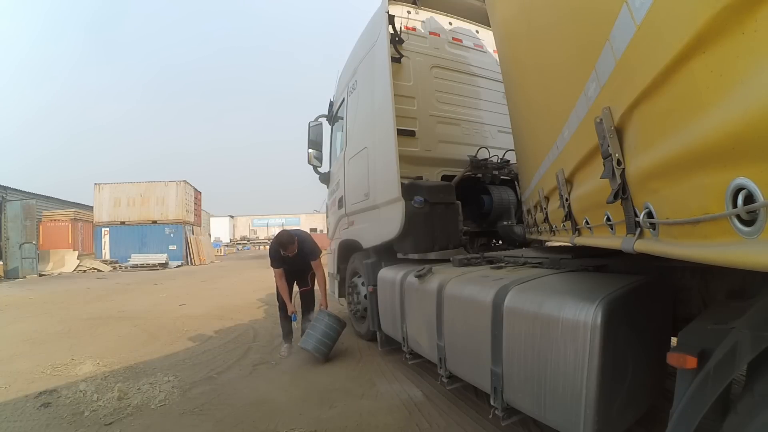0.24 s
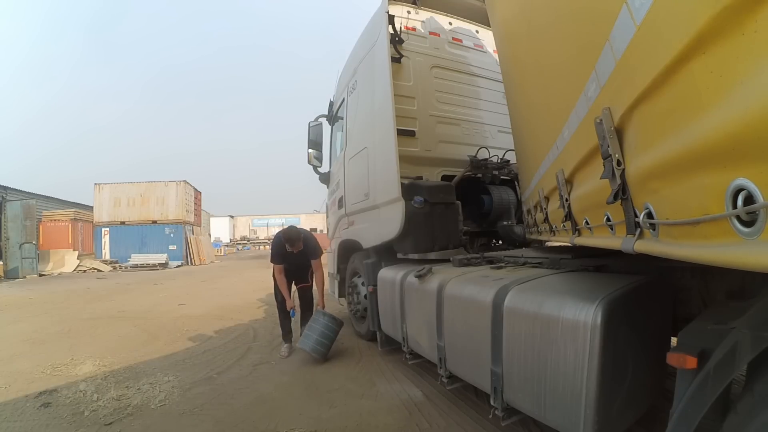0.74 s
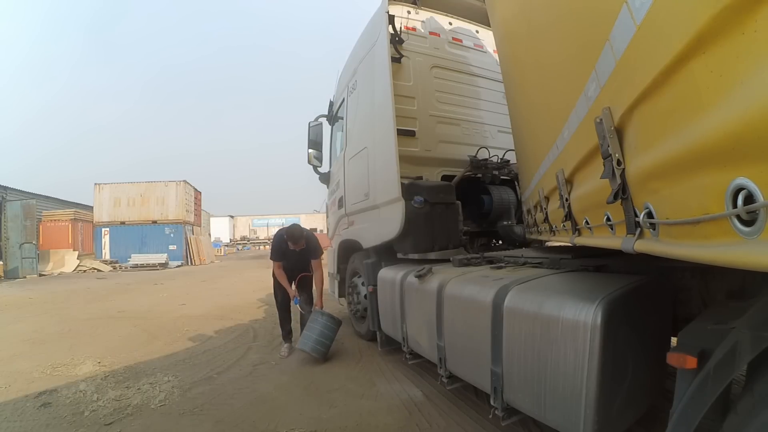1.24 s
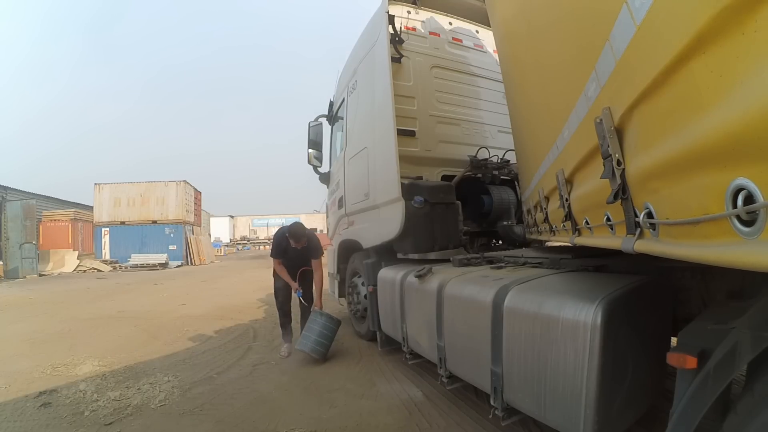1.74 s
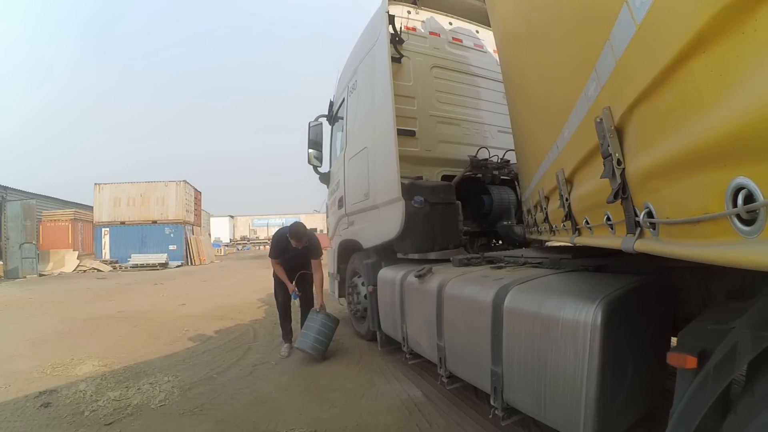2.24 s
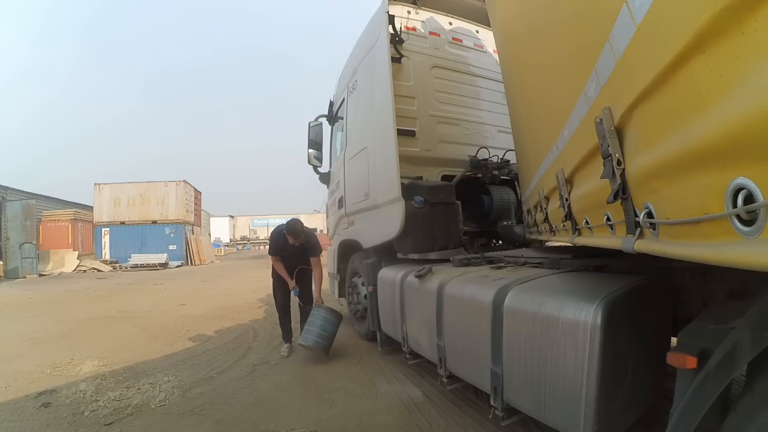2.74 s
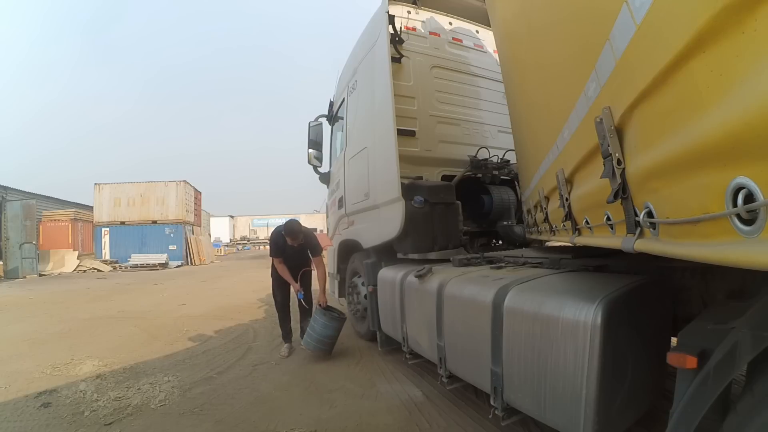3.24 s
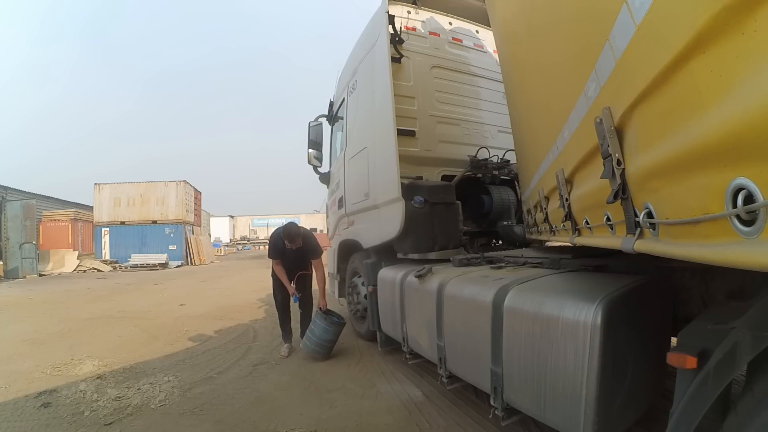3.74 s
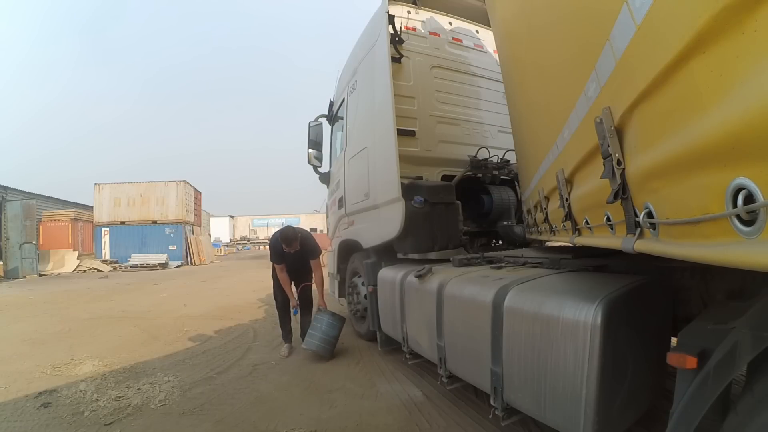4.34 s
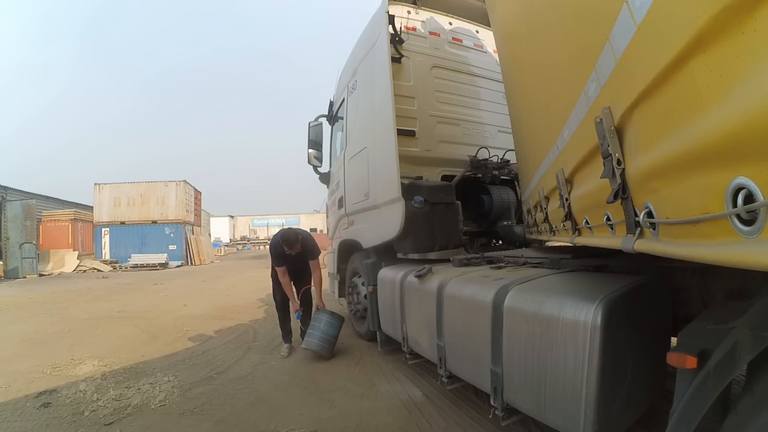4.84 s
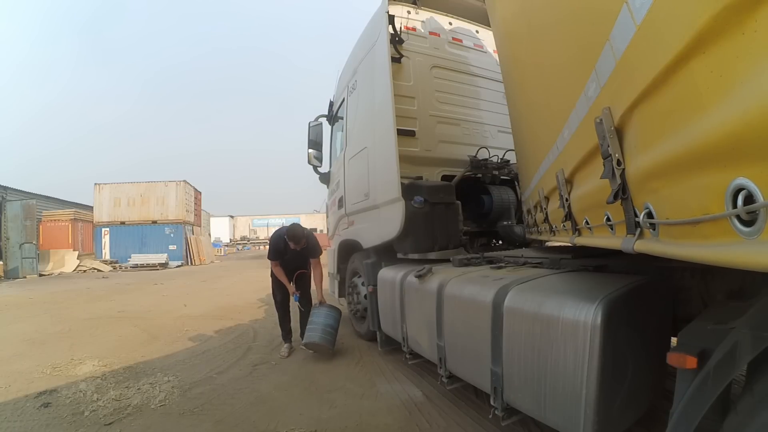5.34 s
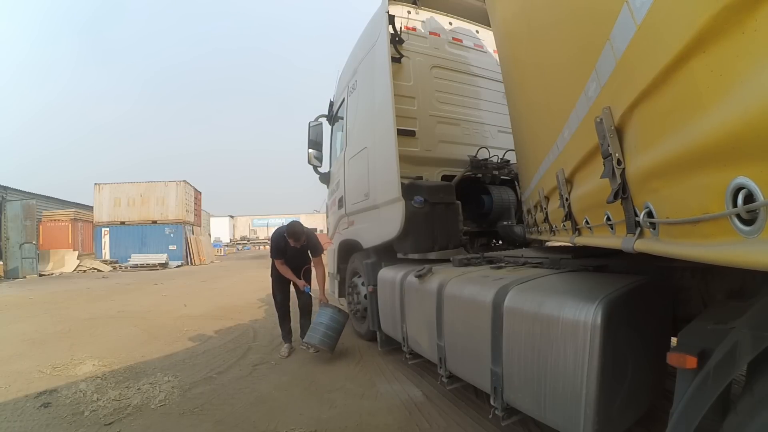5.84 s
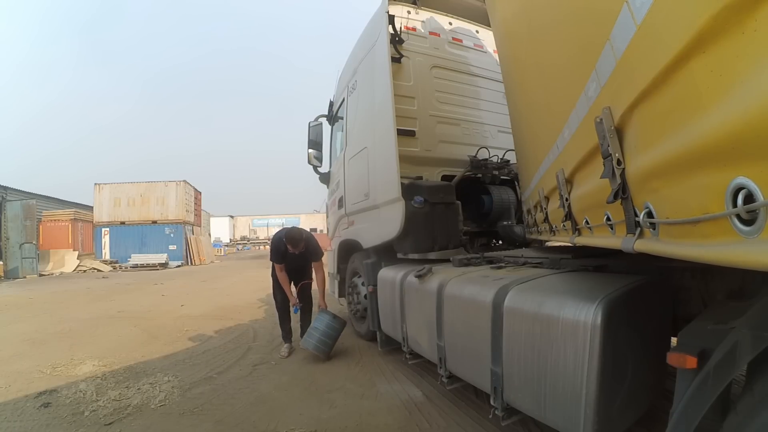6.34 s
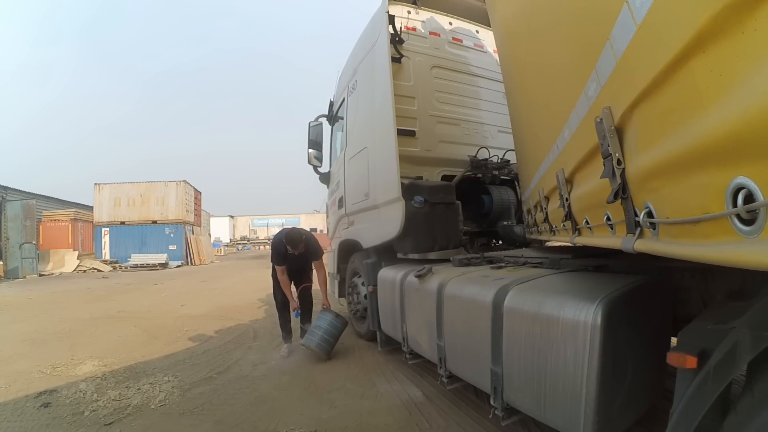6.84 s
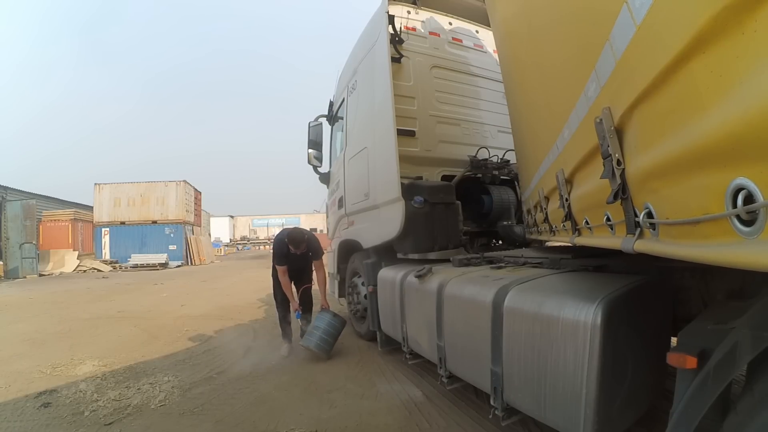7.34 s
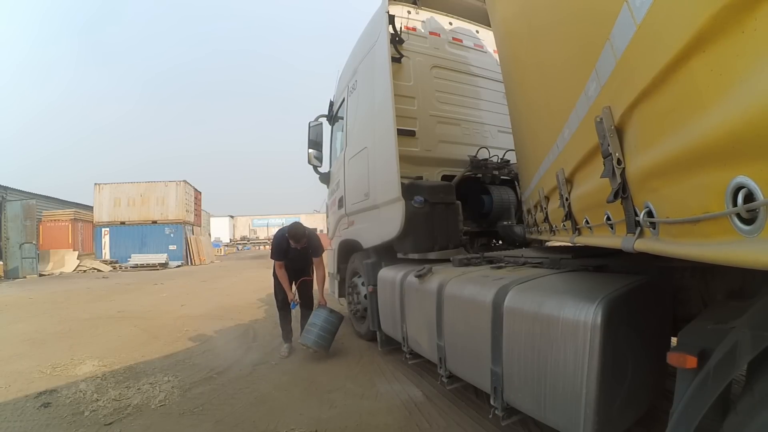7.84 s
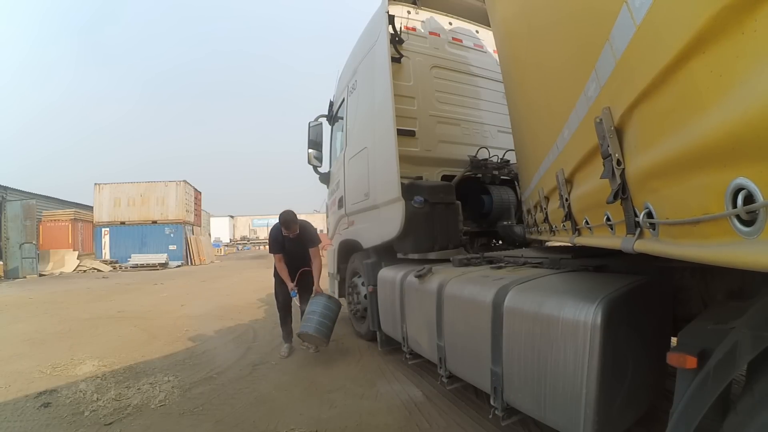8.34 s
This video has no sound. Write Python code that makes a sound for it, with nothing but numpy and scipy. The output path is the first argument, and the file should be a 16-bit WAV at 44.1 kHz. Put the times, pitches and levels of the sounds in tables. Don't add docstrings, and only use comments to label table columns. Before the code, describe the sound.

Bright, rushing compressed air wavers rapidly as it passes over paper folds, wire mesh and a hollow drum-like filter. The air cuts off abruptly and returns five times, the last burst still blowing at the end. Dull dirt scrapes and gritty crunches fill the short pauses above a soft diesel rumble. A strong gust overloads the nearly mono outdoor camera microphone early on, with only a slight, short echo.

```python
import sys
import numpy as np
from scipy import signal
from scipy.fft import rfft, irfft, next_fast_len
from scipy.io import wavfile
from scipy.ndimage import uniform_filter1d

SR = 44100
rng = np.random.default_rng(int(sys.argv[2]) if len(sys.argv) > 2 else 0)


def volts_from_db(level):
    exponent = np.asarray(level, float) / 20
    return 10 ** exponent


def pcm_store(signal):
    levels = np.round(np.clip(np.atleast_2d(signal), -1, 1) * 32767)
    wavfile.write(sys.argv[1], SR, levels.astype(np.int16).T)


N = 379260
T = np.arange(N) / SR


def unit(x):
    return x / np.sqrt(np.mean(x ** 2))


def coloured(points):
    hz, db = np.transpose(points)
    size = next_fast_len(N)
    f = np.arange(size // 2 + 1) * SR / size + 1e-3
    gain = volts_from_db(np.interp(np.log(f), np.log(hz), db, left=-90, right=-90))
    return unit(irfft(rfft(rng.standard_normal(size)) * gain, size)[:N])


def walk(rate):
    k = int(SR / rate)
    stairs = rng.standard_normal(N // 8)[np.arange(N) // k]
    return unit(uniform_filter1d(uniform_filter1d(stairs, k), k))


def patchy(points, patch_db, rate):
    x = coloured(points)
    edges = [hz for hz, _ in points][2:-2]
    low = [signal.sosfilt(signal.butter(2, hz, fs=SR, output="sos"), x) for hz in edges]
    parts = np.diff([0 * x] + low + [x], axis=0)
    return sum(part * volts_from_db(patch_db * walk(rate)) for part in parts)


def resonance(x, hz, width_hz):
    return signal.lfilter(*signal.iirpeak(hz, hz / width_hz, SR), x)


def steep_band(x, hz, width_hz):
    return unit(resonance(resonance(x, hz, width_hz), hz, width_hz))


def resonant(modes, patch_db, rate):
    bands = [steep_band(rng.standard_normal(N), hz, width_hz) for hz, width_hz, _ in modes]
    levels = [volts_from_db(db + patch_db * walk(rate)) for _, _, db in modes]
    return sum(level * band for level, band in zip(levels, bands))


def follow(table):
    s, db = np.transpose(table)
    return np.interp(T, s, db)


def held(start, length, edge_s):
    return np.clip(.5 + np.minimum(T - start, start + length - T) / edge_s, 0, 1)


def steps(rows, rest_db, edge_s):
    return rest_db + sum(held(s, length, edge_s) * (db - rest_db) for s, length, db in rows)


def swell(centre, half):
    return np.cos(np.pi / 2 * np.clip((T - centre) / half, -1, 1))


# frequency in Hz, strength in dB per Hz.
DIRT_COLOUR = [(300, -6), (600, 0), (1200, -2), (2100, -9.5), (2900, -9), (3600, -11), (5000, -27)]
# frequency in Hz, strength in dB per Hz.
GRIT_COLOUR = [(3000, -26), (4000, 4), (6500, 1), (10000, -8), (15000, -21)]
# start in seconds, length in seconds, dull scrape in dB, grit in dB.
SCUFFS = [
    (1.95, .205, -42, -47),
    (2.155, .13, -41, -53),
    (2.285, .09, -42, -48),
    (2.375, .09, -43, -52),
    (2.465, .03, -41, -42),
    (3.65, .3, -51, -57),
    (4.97, .26, -45, -51),
    (6.15, .1, -53, -57),
    (7.58, .34, -43, -49),
]


def yard():
    edge_s = .03
    dirt_db = steps([(s, length, db) for s, length, db, _ in SCUFFS], -55, edge_s)
    grit_db = steps([(s, length, db) for s, length, _, db in SCUFFS], -63, edge_s)
    grit = coloured(GRIT_COLOUR) * volts_from_db(grit_db + 1.2 * walk(40))
    dirt = coloured(DIRT_COLOUR) * volts_from_db(dirt_db + 1.8)
    return (dirt + grit) * volts_from_db(0.2 * walk(29) + 1.3 * walk(150))


# frequency in Hz, strength in dB per Hz.
BUFFET_COLOUR = [(5, -2.5), (12, 0.5), (40, -1.5), (80, -9.5), (130, -27.5), (250, -61)]
# frequency in Hz, strength in dB per Hz.
RUSTLE_COLOUR = [(80, -2), (160, -1.5), (300, -8.5), (500, -13), (1000, -26), (3000, -67)]
# time in seconds, buffeting in dB.
GUST = [(0, -23.5), (.8, -25), (1.15, -25), (1.5, -17.5), (1.9, -10), (2.4, -12.5), (2.8, -11.5),
        (3.05, -17.5), (3.35, -28), (3.8, -23.5), (4.55, -25), (4.85, -13.5), (5.3, -28.5), (6.3, -20.5),
        (7.2, -21), (8.6, -24.5)]
# centre in seconds, half length in seconds, extra buffeting in dB,
# extra rustle in dB.
SURGES = [(0.024, 0.087, -8, 16), (0.197, 0.11, -5, 13.5), (0.933, 0.086, 12, 1.5), (1.297, 0.11, 8.5, 2.5),
          (1.648, 0.065, 14, 4.5), (1.985, 0.047, -1, 11.5), (2.077, 0.045, 6, 3.5), (2.218, 0.2, -6, 4.5),
          (2.337, 0.02, 11, 7), (2.48, .07, 9.5, 0), (2.697, 0.11, 11, 9), (2.84, 0.049, 7, 1),
          (3.115, 0.076, 15, 10), (3.23, .03, 14, 7), (4.553, 0.08, 3, 12), (4.764, 0.064, 0, 0.5),
          (4.985, 0.045, 9, 2), (5.48, .14, 11, 13), (5.691, 0.048, -6, 12.5), (6.22, 0.048, 12, 3),
          (6.784, 0.13, 3.5, 6.5), (7.357, .07, 1, 4), (7.626, 0.074, 9.5, 7.5)]
# time in seconds, peak in dB, width in milliseconds.
POPS = [(1.988, -3.5, 2.2), (2.053, 1, 4.3), (2.238, -9, 1.4), (2.334, 0, 5.6), (2.47, -10.5, 0.98),
        (2.515, -0.5, 4.8), (2.653, 0, 2.6), (2.71, 1.5, 5.8), (2.7291, 1.5, 1.3), (2.7392, -3, 2.16),
        (2.79, -5, 1.5), (2.8486, 3.5, 1.3), (2.856, -4, 2.7), (3.073, -0.5, 3.35), (3.11, 3, 3.3),
        (3.223, -4.5, 3.3), (6.231, -10, 3.3)]


def wind():
    rustle_share = 0.94
    snap_back = 2.17
    screen_limit = .8
    gust_db = follow(GUST)
    buffet_db = gust_db + sum(db * swell(s, half) for s, half, db, _ in SURGES)
    rustle_db = -39 + rustle_share * (gust_db + 25.5)
    rustle_db = rustle_db + sum(db * swell(s, half) for s, half, _, db in SURGES)
    rustle = coloured(RUSTLE_COLOUR) * volts_from_db(rustle_db - 4.5 + 2.37 * walk(35))
    buffet = coloured(BUFFET_COLOUR) * volts_from_db(buffet_db - 3.0)
    out = screen_limit * np.tanh((buffet + rustle) / screen_limit)
    for at, db, ms in POPS:
        near = slice(int((at - .05) * SR), int((at + .05) * SR))
        u = (T[near] - at) * 1000 / ms
        u = u * np.where(u > 0, snap_back, 1)
        out[near] *= 1 - 0.64 * np.exp(-u ** 2 / 8)
        out[near] -= volts_from_db(db) * (1 - 0.5 * u ** 2) * np.exp(-u ** 2 / 2)
    return out


# time in seconds, firing rate in Hz, level of the second order in dB.
IDLE = [(0.0, 27.53, -22), (0.76, 28.07, -32.5), (1.51, 25.36, -24.5), (2.03, 27.75, -23),
        (3.11, 27.36, -24), (3.78, 27.35, -28.5), (4.45, 23.53, -28), (4.859, 26.93, -26.5),
        (5.25, 29.47, -30), (6.272, 25.44, -28), (6.66, 26, -24.5), (7.21, 27.1, -31), (8.6, 27.1, -29)]
# multiple of the firing rate, level in dB.
EXHAUST_ORDERS = [(1, -11.5), (2, -1), (3, -11), (4, -12), (5, -12.5), (6, -48)]


def engine():
    s, hz, db = np.transpose(IDLE)
    rate_hz = np.interp(T, s, hz) * (1 + 0.0077 * walk(9))
    turn = 2 * np.pi * np.cumsum(rate_hz) / SR
    orders = np.zeros(N)
    for multiple, order_db in EXHAUST_ORDERS:
        strength = volts_from_db(order_db + 2.7 * walk(8.6))
        orders += strength * np.sin(round(multiple) * turn + 2 * np.pi * rng.random())
    return np.sqrt(2) * volts_from_db(np.interp(T, s, db)) * orders


# frequency in Hz, level in dB, time to fade by 60 dB in seconds.
PANEL = [(487, 8, 0.035), (650, -3, .08), (740, 2, 0.3), (870, 0, .12), (1090, -15, 0.09), (2510, -5, .15)]


def knock():
    age = np.clip(T[:SR] - .139, 0, None)
    fade = np.exp(-age / 0.006) + 0.45 * np.exp(-age / 0.065)
    blow = np.minimum(age / .004, 1) * rng.standard_normal(SR) * fade
    ring = volts_from_db(-21.0) * unit(resonance(blow, 410, 500))
    for hz, db, t60 in PANEL:
        width_hz = np.log(1000) / np.pi / t60
        ring = ring + volts_from_db(db) * unit(resonance(blow, hz, width_hz))
    return np.pad(volts_from_db(-10.5) * ring / np.abs(ring).max(), (0, N - SR))


# centre in
# seconds, half length in seconds, pitch in Hz, level in dB.
NARROW_SWELLS = [
    (5.09, 0.13, 2570, -45.5),
    (3.85, 0.059, 3100, -54),
    (3.76, .08, 5500, -57),
    (2.61, 0.04, 3500, -39),
    (1.7, .06, 200, -28),
    (2.0, .05, 150, -20),
    (2.485, .02, 900, -34),
    (1.8, 0.061, 140, -22),
    (5.5, .12, 310, -34),
    (2.08, .06, 3800, -49),
]


def rim():
    air = rng.standard_normal(N)
    return sum(volts_from_db(db) * swell(s, half) * steep_band(air, hz, 0.18 * hz) for s, half, hz, db in NARROW_SWELLS)


# start in seconds, end in seconds.
BLASTS = [
    (0, 1.955),
    (2.486, 3.7),
    (3.92, 4.985),
    (5.196, 6.175),
    (6.369, 7.613),
    (7.894, 8.6),
]


def valve():
    trigger = sum((T >= a) & (T < b) for a, b in BLASTS) * 1.
    return uniform_filter1d(trigger, int(0.013 * SR)) ** 2


# frequency in Hz, strength in dB per Hz.
FREE_JET_COLOUR = [(7000, -8), (10000, -2.5), (12000, -3), (15300, -3), (16000, -32)]


def free_jet(aim_db):
    aim_share, aiming_s, sag_db_per_s = 0.77, 0.13, 3
    off_aim = sum(np.exp(-np.abs(T - s) / aiming_s) for s in np.ravel(BLASTS)[1:-1])
    sag_db = sag_db_per_s * sum((T >= a) * (T < b) * (T - a - .5) for a, b in BLASTS)
    level_db = -31 + aim_share * (aim_db + 25) + 7.5 * off_aim - sag_db
    return coloured(FREE_JET_COLOUR) * volts_from_db(level_db + 1.8 * walk(16) - 0.5)


STROKE_EDGE_S = 0.021
# frequency in Hz, strength in dB per Hz.
PLEATS_COLOUR = [(1760, -21.5), (3000, -5), (3610, -7.5), (4060, -3), (5120, -2), (5980, 0.5), (8180, 0),
                 (12000, -6.5), (15600, -15), (22000, -120)]
# start in seconds, length in seconds,
# mesh over the pleats in dB, whistling holes over the mesh in dB.
STROKES = [(-0.01, 0.082, -17.5, 1.5), (0.127, 0.26, -9.5, 1), (0.509, 0.15, -10.7, 1),
           (0.755, 0.083, -12, 3.5), (0.877, 0.085, -9, 2), (1.071, 0.172, -12.5, 4.5),
           (1.332, 0.189, -13.5, 6), (1.594, 0.21, -11, 0), (1.846, 0.075, -12, -5),
           (2.486, 0.28, -17.5, 3), (2.77, 0.25, -13, 1.8), (3.075, 0.11, -11, 3), (3.21, 0.21, -16, 1.5),
           (3.43, 0.025, -8.5, -4), (3.546, 0.1, -13, 2), (3.972, 0.6, -13.5, 0), (4.562, 0.17, -7, 0),
           (4.781, 0.17, -5.5, -1.5), (5.214, 0.4, -13.5, -0.5), (5.69, 0.24, -13, 3.5),
           (5.963, 0.13, -12.5, 6.5), (6.44, 0.18, -10, 3.5), (6.717, 0.22, -11, 1.0),
           (6.98, 0.12, -10, 2.5), (7.117, 0.065, -8.5, 4), (7.218, 0.2, -10, 3.5),
           (7.493, 0.096, -9.5, -0.7), (7.964, 0.13, -14.5, -1), (8.208, 0.22, -16.5, 4),
           (8.48, 0.12, -12.1, 3)]


def pleat_roar():
    roar = patchy(PLEATS_COLOUR, patch_db=1.74, rate=23)
    on_mesh = sum(held(s, length, STROKE_EDGE_S) for s, length, *_ in STROKES)
    on_rib = 1 - np.clip(on_mesh, 0, 1)
    lower = signal.sosfiltfilt(signal.butter(2, 4000, fs=SR, output="sos"), roar)
    return (roar - 0.24 * on_rib * lower) * volts_from_db(-0.45)


# frequency in Hz, width in Hz, level in dB.
MESH_BANDS = [(1894, 820, -1), (2380, 550, -5)]
# frequency in Hz, width in Hz, level in dB.
HOLE_BANDS = [(3580, 930, 0.5), (4420, 1000, -7), (5860, 1000, -10)]


def mesh_and_holes():
    mesh_db = steps([(s, length, db) for s, length, db, _ in STROKES], -20.5, STROKE_EDGE_S)
    holes_db = steps([(s, length, db + over) for s, length, db, over in STROKES], -23.5, STROKE_EDGE_S)
    mesh = resonant(MESH_BANDS, patch_db=2.5, rate=12) * volts_from_db(mesh_db - 2.5)
    holes = resonant(HOLE_BANDS, patch_db=2.5, rate=12) * volts_from_db(holes_db - 2.0)
    return mesh + holes


# frequency in Hz, width in Hz, level in dB.
DRUM_BANDS = [(1115, 580, 1.5), (745, 760, -8.5), (356, 280, -14)]
# start in seconds, length in seconds, level over the pleats in dB.
BOOMS = [(0.012, 0.044, -18), (0.138, 0.19, -16.5), (0.511, 0.16, -17), (0.756, 0.214, -16.5),
         (1.068, 0.19, -12), (1.327, 0.11, -13), (1.487, 0.07, -8), (1.578, 0.28, -11),
         (1.876, 0.053, -6.5), (2.496, 0.19, -15), (2.762, 0.14, -9), (2.917, 0.14, -9),
         (3.079, 0.11, -9.0), (3.233, 0.17, -13.5), (3.542, 0.089, -9.5), (3.959, 0.51, -13),
         (4.538, 0.186, -15), (4.769, 0.19, -12), (5.304, 0.35, -10.5), (5.695, 0.2, -10.3),
         (5.964, 0.18, -13.2), (6.419, 0.22, -12), (6.707, 0.24, -13), (6.978, 0.22, -16.5),
         (7.22, 0.22, -16.5), (7.535, 0.05, -10), (7.904, 0.21, -14), (8.209, 0.22, -12.5),
         (8.471, 0.039, -12.5), (8.539, 0.05, -13)]


def drum():
    level_db = steps(BOOMS, -22, STROKE_EDGE_S)
    return resonant(DRUM_BANDS, patch_db=0.5, rate=9.9) * volts_from_db(level_db - 0.45)


def echo(x):
    age = T[:SR // 2]
    tail = rng.standard_normal(len(age)) * volts_from_db(-60 * age / .25)
    wash = signal.fftconvolve(x, tail / np.sqrt(np.sum(tail ** 2)))[:N]
    return volts_from_db(-30) * signal.lfilter(*signal.butter(1, 14000, fs=SR), wash)


# delay in milliseconds, share of the direct sound.
GLANCES = [(.52, .12), (.86, .22), (.95, -.16), (1.14, .13), (2.68, -.08), (2.81, .08)]


def glances(x):
    out = np.zeros(N)
    for ms, share in GLANCES:
        late = np.pad(x, (int(ms * SR / 1000 + .5), 0))[:N]
        out += share * (0.34 + .5 * walk(3.957)) * late
    return out


# time in seconds, jet on the pleats in dB.
SWEEPS = [
    [(0.0, -17.5), (0.2, -26.5), (0.646, -22.5), (0.824, -28), (1.634, -24.5), (1.682, -29.5), (1.754, -23),
     (1.938, -29), (1.95, -38)],
    [(2.49, -37), (2.496, -34.5), (2.92, -18.5), (3.048, -30.5), (3.282, -22), (3.348, -30.5), (3.408, -21),
     (3.568, -26), (3.69, -36.5)],
    [(3.93, -34), (4.02, -20), (4.23, -21.5), (4.354, -31.5), (4.494, -23.5), (4.646, -29), (4.678, -25.5),
     (4.936, -28), (4.98, -34)],
    [(5.2, -32), (5.39, -20.5), (5.488, -22.5), (5.616, -21), (5.79, -28), (5.864, -22.5), (5.89, -27.5),
     (6.01, -23), (6.17, -38.5)],
    [(6.375, -30), (6.613, -20), (6.741, -23), (6.789, -32.5), (6.871, -30.5), (6.911, -23.5), (7.029, -26),
     (7.519, -25.5), (7.605, -33)],
    [(7.9, -31.5), (7.952, -28), (7.994, -19), (8.138, -18), (8.33, -30), (8.434, -22), (8.514, -26),
     (8.6, -33)],
]


def blow_gun():
    aim_db = follow(np.concatenate(SWEEPS)) + 0.95
    flutter_db = 0.58 * walk(90) + 0.51 * walk(400)
    missing = free_jet(aim_db)
    on_filter = volts_from_db(aim_db) * (pleat_roar() + mesh_and_holes() + drum())
    jet = valve() * volts_from_db(flutter_db) * (missing + on_filter)
    return jet + echo(jet) + glances(jet)


# time in seconds, level in dB.
SPREADS = [
    (.315, -27),
    (0.701, -41),
    (1.46, -48),
    (3.2, -48),
    (6.501, -33),
    (8.002, -23),
]


def spread():
    patches = sum(volts_from_db(db) * swell(s, 0.012) for s, db in SPREADS)
    hiss = coloured([(3400, -32), (4000, -4), (8000, 3), (15000, -4)])
    return patches * hiss + volts_from_db(-47.5) * coloured(BUFFET_COLOUR)


def scene():
    middle = blow_gun() + engine() + wind() + yard() + knock() + rim()
    return middle + np.outer([1, -1], spread())


def top_cut(x):
    return signal.sosfilt(signal.butter(12, 16430, fs=SR, output="sos"), x)


def record(dry):
    dull = signal.sosfilt(signal.ellip(12, .2, 60, 15280, fs=SR, output="sos"), dry)
    return top_cut(np.clip(dull, -1, 1))


dry = scene()
out = record(dry)
pcm_store(out)
```